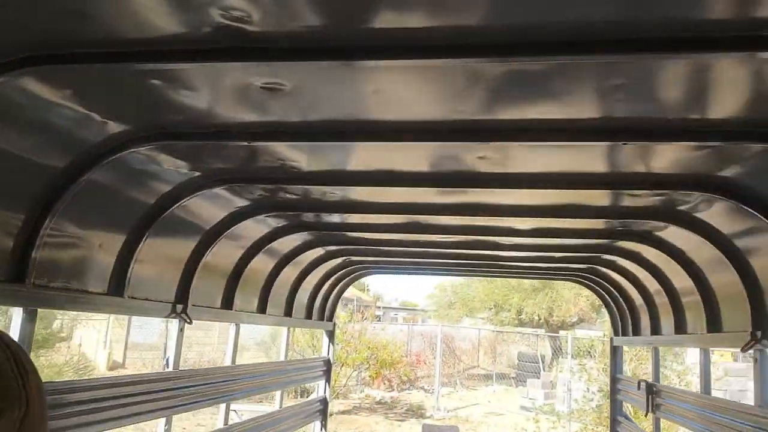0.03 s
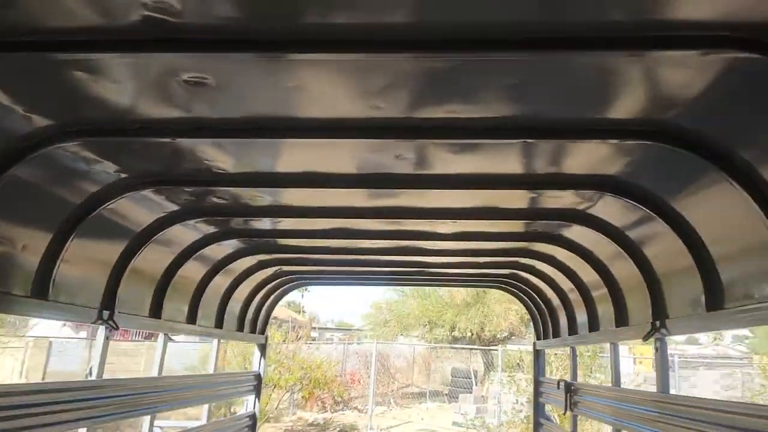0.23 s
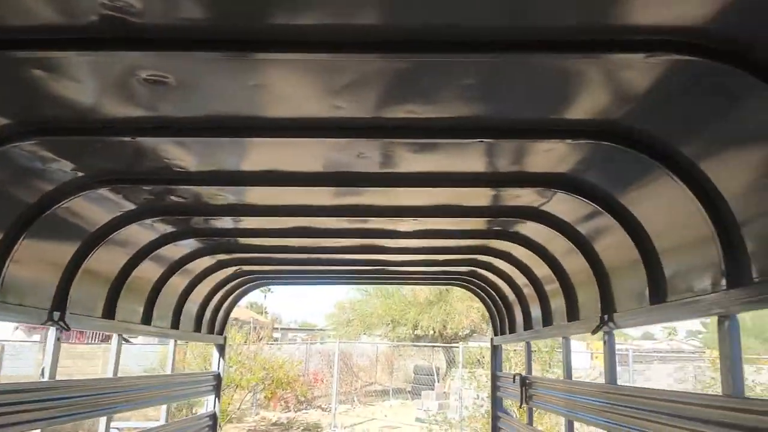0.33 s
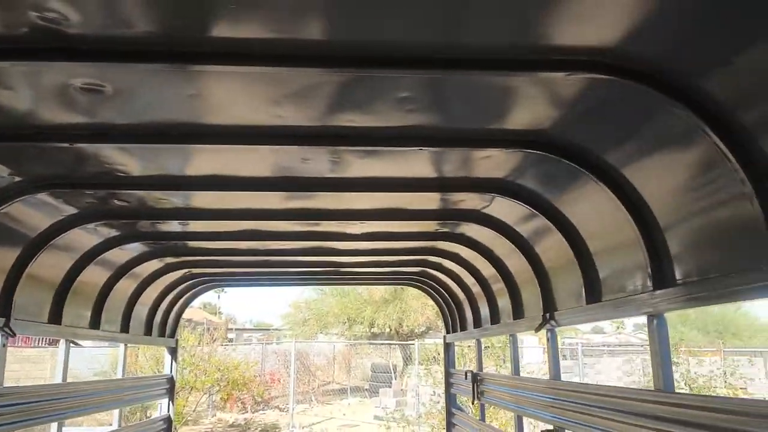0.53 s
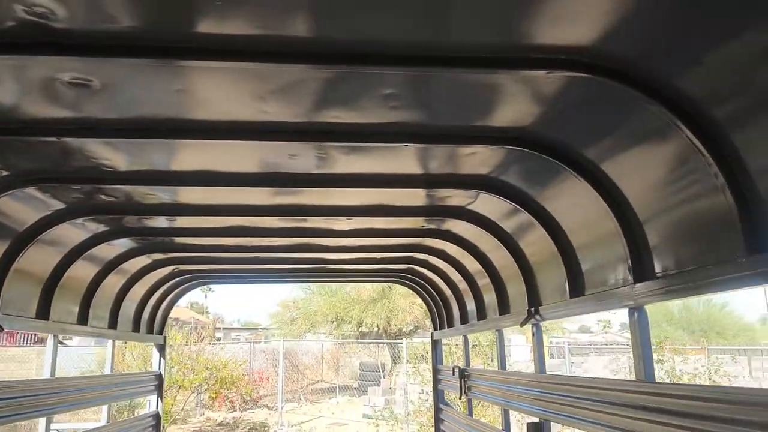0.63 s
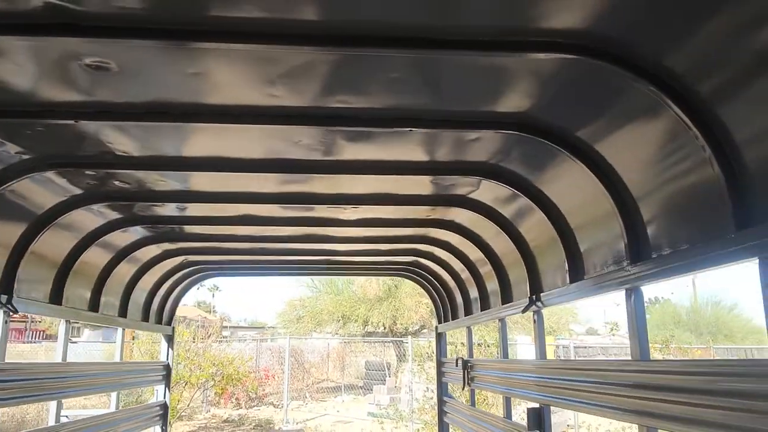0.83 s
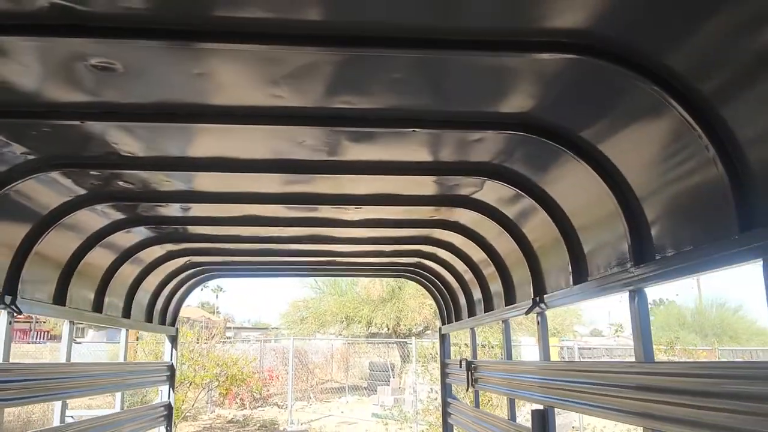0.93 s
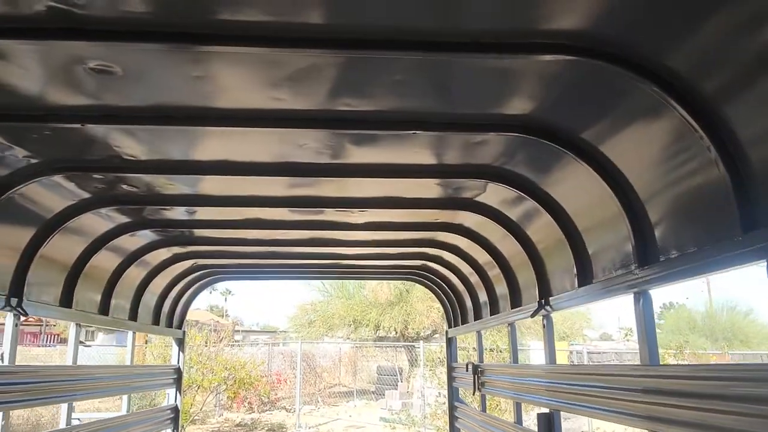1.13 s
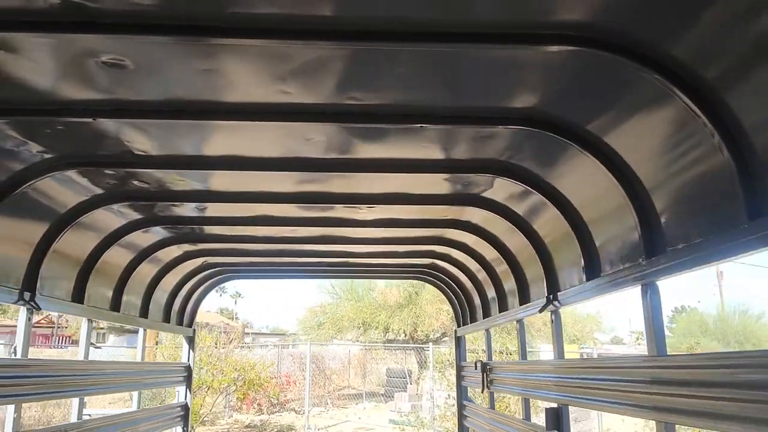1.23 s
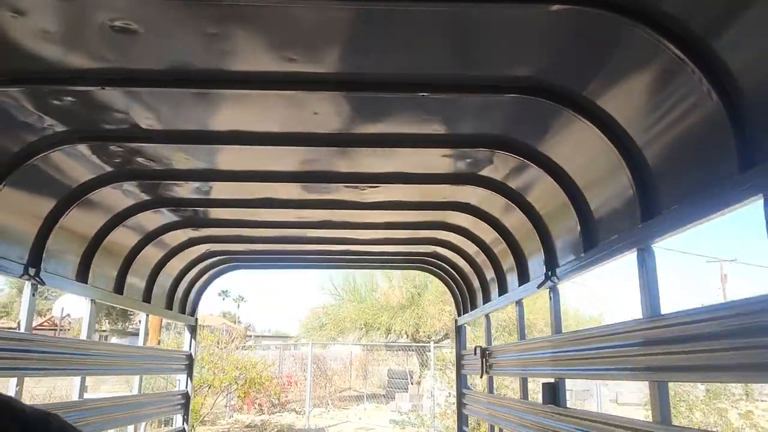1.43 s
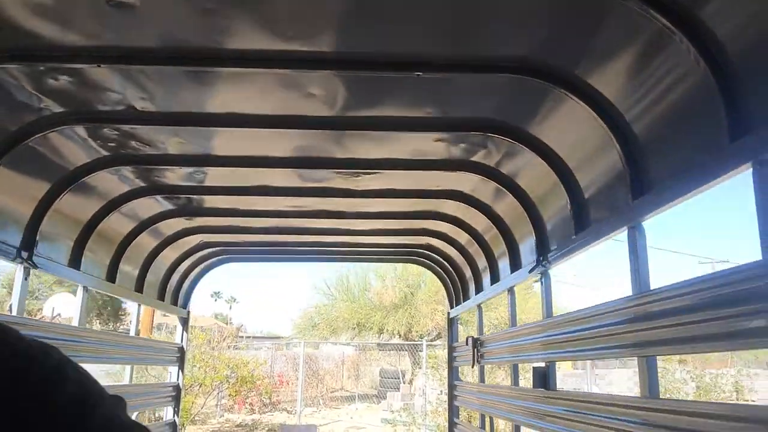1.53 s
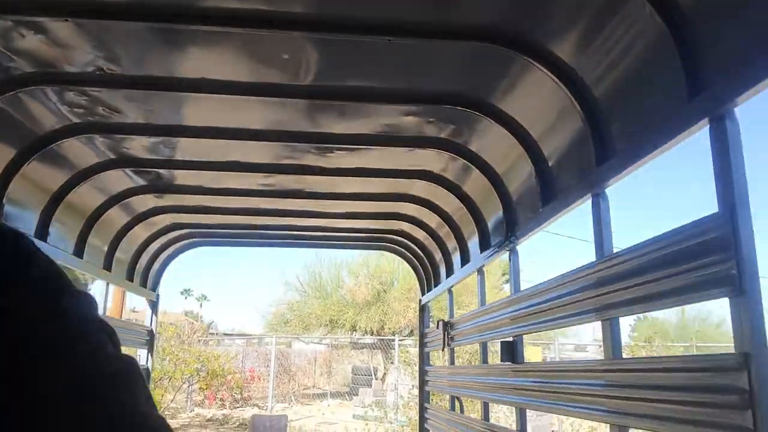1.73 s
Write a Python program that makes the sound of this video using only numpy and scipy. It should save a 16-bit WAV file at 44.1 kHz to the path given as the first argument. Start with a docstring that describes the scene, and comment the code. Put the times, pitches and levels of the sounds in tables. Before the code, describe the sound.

Sheet metal bangs and clatters in a hollow trailer, followed by a softer thud.

```python
"""Bang and thump in an empty metal stock trailer

Sheet metal bangs and clatters to rest, then a duller thump, like a footfall, hits the floor.
Both ring the shell's modes; the hollow interior booms in throbs. Loose fittings tick, shoes and
clothing scuff, faint high rustles swell. Yard rumble and a distant bird enter by the open sides."""
import sys
import numpy as np
from scipy import signal
from scipy.fft import rfft, irfft
from scipy.io import wavfile
from scipy.ndimage import uniform_filter1d

SR = 44100
rng = np.random.default_rng(int(sys.argv[2]) if len(sys.argv) > 2 else 0)


def transcribe(u):
    """Save the signal u as a 16-bit wav file named by the first command-line argument.

    u: samples, shape (n,) or (channels, n), limited to [-1, 1]; the rate is SR.
    q: integer samples, one column per channel.
    """
    v = np.clip(np.atleast_2d(u).T, -1, 1)
    q = np.round(v * 32767).astype(np.int16)
    wavfile.write(sys.argv[1], SR, q)


N = 79380
BANG_S, THUMP_S = 0.2392, 0.9255


def amp(db):
    """Decibels to gain."""
    return 10 ** (np.asarray(db) / 20)


def lookup(points, hz):
    """Table value, interpolated over log frequency."""
    f, value = np.transpose(points)
    return np.interp(np.log(hz + 1), np.log(f + 1), value)


def pan(db):
    """Constant-power gains, left over right by db."""
    gains = amp([[db / 2], [-db / 2]])
    return gains / np.sqrt(np.mean(gains ** 2))


def add(mix, start_s, sound):
    """Mix in a stereo sound at start_s."""
    part = mix[:, round(start_s * SR):][:, :sound.shape[1]]
    part += sound[:, :part.shape[1]]


def tone(hz):
    """Steady sine."""
    return np.sin(2 * np.pi * hz * np.arange(N) / SR)


def noise(spectrum, tilt=None):
    """Stereo noise of given spectral density; unit RMS before the tilt."""
    # left-right coherence: f/Hz, correlation
    coherence = [(25, 1), (70, 0.96), (130, 0.87), (300, 0.87), (600, .4), (1000, 0.15), (2000, 0.1),
                 (12000, 0.067)]
    hz = np.fft.rfftfreq(N, 1 / SR)
    a, b = rfft(rng.standard_normal((2, N)))
    correlation = np.clip(lookup(coherence, hz), -1, 1)
    mid, side = a * np.sqrt(1 + correlation), b * np.sqrt(1 - correlation)
    bins = np.array([mid + side, mid - side]) * amp(lookup(spectrum, hz))
    rms = irfft(bins, N).std()
    return irfft(bins * (amp(lookup(tilt, hz)) if tilt else 1), N) / rms


def envelope(rise_s, t60_s):
    """Linear rise, exponential fall."""
    t = np.arange(N) / SR
    return np.minimum(t / rise_s, 1) * np.exp(-np.log(1000) * t / t60_s)


def ring(spectrum, decay, rise_s):
    """Dense panel modes struck at once: noise bands, each with its own T60."""
    hz, bins = np.fft.rfftfreq(N, 1 / SR), rfft(noise(spectrum))
    centres_hz, t60s = np.transpose(decay)
    weights = [lookup(np.c_[centres_hz, row], hz) for row in np.eye(len(decay))]
    return sum(irfft(bins * w, N) * envelope(rise_s, t60_s) for w, t60_s in zip(weights, t60s))


def yard(level_db=-40.5, swell_rms_db=0.67):
    """Outdoor rumble, coloured by the hollow trailer, wavering slightly."""
    # rumble inside: f/Hz, level/dB
    spectrum = [(20, -23.5), (30, -19.5), (42, 1), (60, 1), (78, 3.5), (100, -8), (150, -11), (195, -26),
                (235, -18), (300, -25.5), (620, -28.5), (800, -33.5), (1000, -35.5), (1600, -41.5),
                (2300, -49), (3300, -47.5), (4500, -57.5), (7000, -70), (10000, -61.5), (13000, -60.5),
                (15500, -63.5)]
    t = np.arange(N) / SR
    swell = sum(np.sin(2 * np.pi * (hz * t + rng.random())) for hz in np.geomspace(0.5, 6, 10))
    return amp(level_db + swell_rms_db * swell / swell.std()) * noise(spectrum)


def scuffs():
    """Shoes and clothing rub in short, soft bursts."""
    # rubs: t/s, level/dB, T60/s, body/dB, treble/dB
    rubs = [(0.022, -56, 0.1, 4.5, 9), (0.067, -64.5, 0.062, 9, 12), (0.1117, -55.5, 0.11, -2, 9.5),
            (.589, -74.5, 0.036, 4, 2.5), (0.617, -53.5, 0.05, 0, -9), (0.716, -52.5, 0.038, 2, -12),
            (0.794, -50, 0.056, 7, -1), (.833, -56, 0.11, -8, 4), (0.851, -49.5, 0.097, 3.5, -1.5),
            (1.3405, -44, 0.084, -12, 0), (1.437, -52, 0.021, -13, -0.5), (1.467, -57.5, 0.051, 13, -12),
            (1.524, -64, 0.049, 15, 7), (1.619, -61.5, 0.033, 5, 13)]
    # friction noise: f/Hz, level/dB
    spectrum = [(400, 21.5), (1500, 3), (2700, 9.5), (4000, 0), (6000, -12.5), (9000, -9), (13000, -1.5),
                (15500, -10)]
    out = np.zeros((2, N))
    for s, db, t60_s, body_db, treble_db in rubs:
        tilt = [(700, body_db), (2000, 0.015), (3500, 0.0072), (9000, treble_db)]
        add(out, s, amp(db) * pan(3) * noise(spectrum, tilt) * envelope(0.00067, t60_s))
    return out


def bird(glide_s=0.006, waver_depth=0.0077):
    """Distant thin whistle that drops in pitch and settles."""
    # calls: t/s, length/s, start f/Hz, end f/Hz, level/dB
    chirps = [(0.064, 0.125, 4400, 3500, -63.5)]
    out = np.zeros((2, N))
    for s, length_s, start_hz, end_hz, db in chirps:
        t = np.arange(0, length_s, 1 / SR)
        waver = uniform_filter1d(rng.standard_normal((2, N)), size=130)[:, :len(t)]
        glide_hz = end_hz + (start_hz - end_hz) * np.exp(-t / glide_s)
        hz = glide_hz * (1 + waver_depth * waver / waver.std())
        swell = np.sin(np.pi * np.sqrt(t / length_s))
        add(out, s, amp(db) * swell * np.sin(2 * np.pi * np.cumsum(hz, axis=1) / SR))
    return out


def scrape(length_s=0.028, end_db=-28, rise_db=26):
    """The sheet scrapes, growing louder until it lands."""
    # sliding sheet: f/Hz, level/dB
    spectrum = [(60, -9.5), (350, 7), (500, 5), (600, -20.5), (1100, -7.5), (2800, -11.5), (4500, -36.5),
                (12000, -35)]
    out, count = np.zeros((2, N)), round(length_s * SR)
    approach = amp(end_db + np.linspace(-rise_db, 0, count))
    add(out, BANG_S - length_s, approach * pan(3.5) * noise(spectrum)[:, :count])
    return out


def bang(rise_s=0.00063, rebound_rise_s=0.0022):
    """The blow shoves the panel and rings the walls; the sheet cracks, clangs and rebounds."""
    # first shove on the panel: f/Hz, level/dB
    shove = [(30, 3), (110, 23.5), (200, 12.5), (330, 14.5), (480, 10.5), (620, -48), (1200, -43)]
    # dense wall ring: f/Hz, level/dB
    walls = [(25, -10), (60, -10), (120, 9), (220, -2), (270, -8.5), (400, 10.5), (490, -7.5), (580, -23),
             (850, -13.5), (1400, -12), (2000, -32), (3200, -17.5), (4500, -43), (12000, -51.5)]
    # wall damping: f/Hz, T60/s
    wall_decay = [(60, 0.75), (200, 0.45), (450, 0.37), (900, 0.33), (2000, 0.098), (4000, 0.2),
                  (12000, 0.51)]
    # sheet modes: f/Hz, level/dB re contact, T60/s
    sheet_modes = [(822, -35.5, 0.5), (875, -20.5, .21), (915, -17, .21), (1113, -30, .1),
                   (1273, -16.5, 0.069), (1592.6, -21.5, .15), (1665, -16, 0.053), (1750, -21, .13),
                   (1773, -11, 0.059), (1980, -21.5, 0.079), (2264, -30.5, .12), (2650, -26, .08),
                   (3085, -34, .08)]
    # hard contacts: t/s, level/dB, T60/s, pan/dB
    cracks = [(0.2383, -23.5, 0.029, -3), (0.2413, -11.5, 0.034, 24), (0.2483, -11, 0.017, 6),
              (0.2555, -19.5, 0.0097, 25)]
    # struck sheet: f/Hz, level/dB
    crack_spectrum = [(500, -5), (740, -36), (900, 2.5), (1080, -7), (1270, 1.5), (1430, -26), (1620, -1),
                      (1900, -4), (2300, -3), (3000, -9), (4000, -21.5), (7000, -37.5), (9000, -25.5),
                      (12500, -33), (15500, -36)]
    # bounces: t/s, level/dB, T60/s, pan/dB
    rebounds = [(.2640, -19.5, .04, -1), (.2898, -20.5, 0.059, 0), (.2970, -39, 0.055, 5),
                (0.3106, -32.5, 0.12, 3)]
    # bouncing sheet: f/Hz, level/dB
    clack_spectrum = [(450, -13), (700, -6.5), (890, 14), (1100, -11.5), (1400, -10), (1650, 7),
                      (2000, -1.5), (2400, -14.5), (3100, -21.5), (4000, -32), (12000, -41)]
    out = np.zeros((2, N))
    add(out, BANG_S, amp(-4) * pan(-4) * noise(shove) * envelope(rise_s, t60_s=0.1))
    add(out, BANG_S, amp(-18) * pan(-10) * ring(walls, wall_decay, rise_s=0.0019))
    clang = pan(3.5) * sum((-1) ** k * amp(db) * tone(hz) * envelope(rise_s, t60_s)
                           for k, (hz, db, t60_s) in enumerate(sheet_modes))
    for s, db, t60_s, pan_db in cracks:
        crack = pan(pan_db) * noise(crack_spectrum) * envelope(rise_s, t60_s)
        add(out, s, amp(db) * (crack + clang))
    for s, db, t60_s, pan_db in rebounds:
        clack = pan(pan_db) * noise(clack_spectrum) * envelope(rebound_rise_s, t60_s)
        add(out, s, amp(db) * (clack + amp(1) * clang))
    return out


def boom(hz=79.58):
    """The interior's lowest resonance throbs as it dies away."""
    # throbs: crest t/s, level/dB, length/s
    throbs = [(0.253, -13.5, 0.051), (0.356, -15.5, 0.1), (0.429, -29.5, 0.08), (0.527, -19, 0.076),
              (0.64, -22.5, 0.082), (0.721, -24.5, 0.065), (0.875, -31.5, 0.17), (1.0, -20, 0.24),
              (1.17, -30.5, 0.11)]
    t = np.arange(N) / SR
    gain = sum(amp(db) * np.cos(np.pi * np.clip((t - s) / length_s, -0.5, 0.5)) ** 2
               for s, db, length_s in throbs)
    return pan(1) * gain * tone(hz)


def shell(base_rise_s=0.00118, rise_cycles=0.56, bang_lag_s=0.00032, thump_lag_s=-0.0004):
    """Both blows ring the same trailer modes, heard from opposite sides."""
    # shell and interior modes: f/Hz, T60/s, bang level/dB, thump level/dB, pan/dB
    modes = [(111, 0.26, -13, -33.5, -2.5), (123.2, 0.22, -12.5, -22.5, -6),
             (127.94, 0.37, -33.5, -11.5, 29), (151.8, 0.54, -29.5, -31, 2), (158.3, 0.084, -27, -4.5, 2),
             (196.2, 0.37, -19, -29, 7), (225.4, 0.58, -22, -39, 2.5), (243.4, 0.64, -29, -32, -6.5),
             (311.4, .18, -24.5, -46.5, -6), (355, 0.57, -38.5, -32, -0.5), (383.2, 0.45, -21, -46, -2.5),
             (396.4, 0.34, -22.5, -31, -6), (422, 0.35, -26.5, -27, -3.5), (454, .9, -27, -37.5, -1.5),
             (479.7, 0.38, -22, -53.5, 1), (491.7, 0.37, -34, -29.5, 6), (524.7, .2, -32.5, -40, -6.5),
             (594, 0.36, -35.5, -28, -5), (617, .5, -40.5, -55, 1.5), (645, 0.46, -41, -32, 2),
             (932, 0.26, -49, -31.5, 3), (1063, .25, -38.5, -40, 3.5)]
    out, t = np.zeros((2, N)), np.arange(N) / SR
    for k, (hz, t60_s, bang_db, thump_db, pan_db) in enumerate(modes):
        fade = (-1) ** k * pan(pan_db) * envelope(base_rise_s + rise_cycles / hz, t60_s)
        for s, db, lag_s in [(BANG_S, bang_db, bang_lag_s), (THUMP_S, thump_db, thump_lag_s)]:
            stereo_t = t + np.array([[-lag_s], [lag_s]]) / 2  # positive lag: left late
            add(out, s, amp(db) * fade * np.sin(2 * np.pi * hz * stereo_t))
    return out


def ticks():
    """Loose fittings tick dryly after the bang."""
    # contacts: t/s, level/dB, pan/dB
    contacts = [(0.2704, -17.5, 27), (0.2897, -31, 16), (0.2972, -20.5, 23), (0.2976, -57, 5.5),
                (0.3226, -30, 10), (.3605, -42.5, 12.5), (0.3966, -39, 12), (0.4118, -46, 14.5)]
    # one tick: f/Hz, level/dB
    spectrum = [(600, -9), (2200, 11.5), (4000, -3), (5500, -2.5), (7000, -10.5), (9000, -3), (12000, -14),
                (15500, -14)]
    out = np.zeros((2, N))
    for s, db, pan_db in contacts:
        add(out, s, amp(db) * pan(pan_db) * noise(spectrum) * envelope(0.00086, t60_s=0.0044))
    return out


def thump(rise_s=0.005):
    """Heel and sole thud on the floor and crush a little grit."""
    # heel, roll, sole: t/s, thud level/dB, grit level/dB
    contacts = [(0.9234, -22, -63), (.9400, -21, -47), (.9650, -25, -45)]
    # floor thud: f/Hz, level/dB
    thud = [(40, -1), (90, 6), (170, 6.5), (240, -18.5), (300, -9.5), (370, -2), (470, -2), (550, -11),
            (780, -10), (1030, -10), (1400, -19), (1750, -19.5), (2300, -26.5), (3500, -36), (4500, -38.5),
            (5500, -47), (8000, -47.5)]
    # floor damping: f/Hz, T60/s
    thud_decay = [(60, 0.31), (200, 0.42), (450, 0.4), (900, 0.27), (2000, 0.27), (4000, 0.22),
                  (12000, 0.11)]
    # crushed grit: f/Hz, level/dB
    grit = [(1500, 1), (3500, 4), (6500, -27), (8500, -4), (11000, 0), (13000, 2), (15500, -16)]
    out = np.zeros((2, N))
    for s, thud_db, grit_db in contacts:
        add(out, s, amp(thud_db) * pan(0.5) * ring(thud, thud_decay, rise_s))
        add(out, s, amp(grit_db) * pan(1.5) * noise(grit) * envelope(rise_s, t60_s=0.13))
    return out


def rustles(whistle_hz=5050, skirt_hz=1320):
    """Faint airy rustling with a narrow whistling band."""
    # swells: t/s, length/s, level/dB, whistle/dB re rustle
    swells = [(1.06, 0.25, -76.5, -1.5), (1.68, .2, -74.5, -18)]
    # airy hiss: f/Hz, level/dB
    spectrum = [(3000, -33.5), (4600, -23), (6000, -27), (9000, -7), (10200, -6), (11200, -7.5), (12500, 1),
                (15500, -9)]
    whistle = [(whistle_hz - skirt_hz, -50), (whistle_hz, 0), (whistle_hz + skirt_hz, -50)]
    out = np.zeros((2, N))
    for s, length_s, db, whistle_db in swells:
        swell = np.hanning(round(length_s * SR))
        hiss = noise(spectrum) + amp(whistle_db) * noise(whistle)
        add(out, s, amp(db) * swell * hiss[:, :len(swell)])
    return out


def scene():
    """All sources, heard inside the trailer."""
    return yard() + scuffs() + bird() + scrape() + bang() + boom() + shell() + ticks() + thump() + rustles()


def record(dry):
    """Soft clip at full scale, then low-pass."""
    cutoff_hz = 15800
    clipped = dry / (1 + dry ** 8) ** (1 / 8)
    lowpass = signal.firwin(511, cutoff_hz, window=("kaiser", 9), fs=SR)
    return signal.oaconvolve(clipped, lowpass[None], "same")


dry = scene()
out = record(dry)
transcribe(out)
```